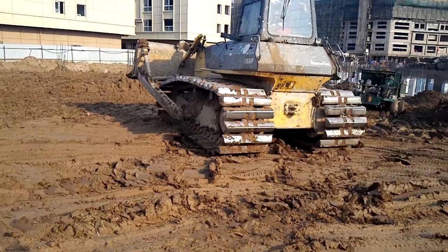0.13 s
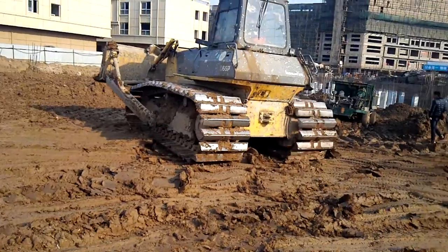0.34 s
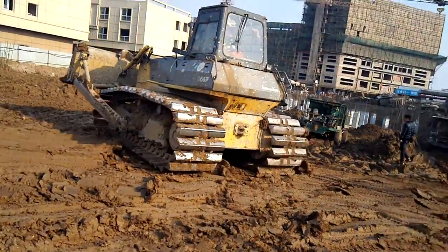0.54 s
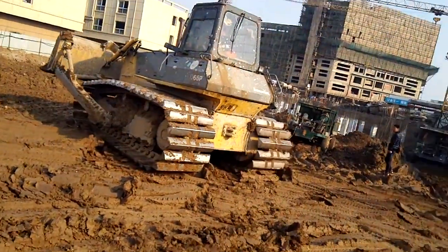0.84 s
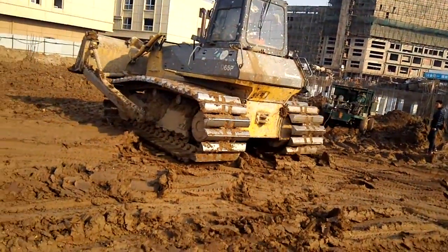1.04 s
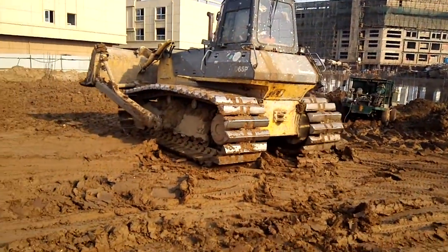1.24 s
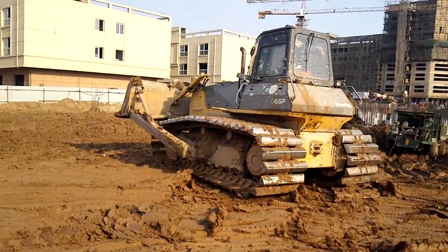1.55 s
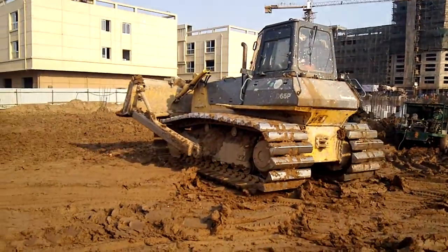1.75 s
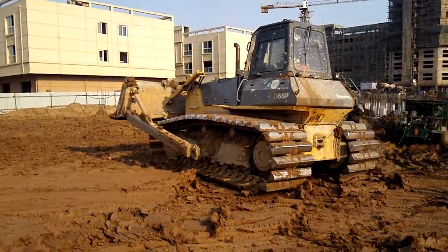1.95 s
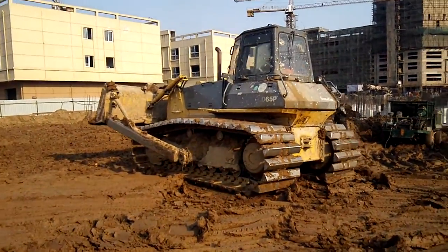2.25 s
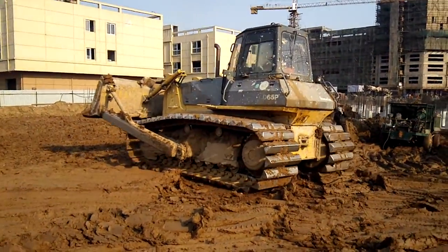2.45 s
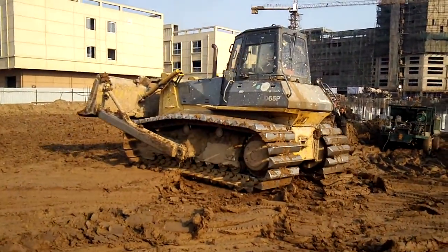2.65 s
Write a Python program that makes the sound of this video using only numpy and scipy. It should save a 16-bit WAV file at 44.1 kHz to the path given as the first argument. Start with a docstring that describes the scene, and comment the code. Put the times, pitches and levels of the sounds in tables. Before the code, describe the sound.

Close bulldozer diesel roar with harsh bursts of squealing, clattering metal tracks on an open building site.

```python
"""A crawler bulldozer drives over a muddy building site, a few metres away, as the sound fades in.
Its six-cylinder diesel drones at governed speed: harmonic puffs, filtered noise, fan tones, a turbo whistle.
From the first moments its dry steel tracks slip in grinding bursts of little impacts that ring the shoes;
squeaks and singing pins are trembling tones, and clanks are decaying modes heard in the middle stretch.
Then the chassis bumps once, a swell of resonant noise, and the fan drone grows towards the end."""
import sys
import numpy as np
from scipy import signal
from scipy.fft import rfft, irfft
from scipy.io import wavfile

SR = 44100
rng = np.random.default_rng(int(sys.argv[2]) if len(sys.argv) > 2 else 0)


def int16_out(signal):
    """Quantize to a 16-bit WAV file."""
    q = np.round(np.clip(np.atleast_2d(signal).T, -1, 1) * 32767)
    wavfile.write(sys.argv[1], SR, q.astype(np.int16))


N = 123039
TIME = np.arange(N) / SR
FREQS = np.maximum(np.fft.rfftfreq(N, 1 / SR), 1)

# engine
CYCLE_HZ, FIRST_FIRING_S = 13.42, .0013   # four-stroke cycles per second
SPEED_WANDER = .0004   # share of the crank speed
TONE_WAVER_DB, PUFF_SPREAD_DB = .7, 1   # of each order; of all tones together
FAN_HZ, FAN_WAVER_DB = 142.9, .8   # blade rate
CLATTER_DB, RUMBLE_DB = -20.5, -26.8
KNOCK_DB, KNOCK_S, KNOCK_SPREAD_DB = -39, 0.0051, 3
TICKS_PER_S, TICK_DB, TICK_S = 160, -30, 0.00095   # hard contacts, at unit knock strength
CYCLE_REPEAT = .25   # share of the clatter's power that is the same in every cycle
TURBO_DB, TURBO_WIDTH_HZ, TURBO_PAN_DB = -35.5, 52, 4
THUD_S, THUD_LENGTH_S, THUD_HZ, THUD_DB = 1.8, 0.055, 215, -20.5

# tracks
SLIP_GRAINS_PER_S, GRAIN_SPREAD_DB = 5000, 1   # rate in each noise stream
SLIP_LIKENESS = 0.31   # share of power common to both sides
SLIP_ATTACK_S, SLIP_RELEASE_S = 0.00085, 0.0066
SNAP_DB, SNAP_S = -16, 0.00094   # the link breaks loose with a snap
CHATTER_DB, CHATTER_PER_S = 0.5, 54   # a sliding link catches and lets go
SHOE_SPREAD_DB, SHOE_DETUNE = 2.5, 0.02   # from link to link; detune as a share
SHOE_RING_DB, SHOE_RING_WIDTH_HZ = -7, 70   # sharp modes beside the broad ones
SQUEAK_WIDTH_HZ = 110   # at the pitch of the lower pin mode
SQUEAK_SAG_PER_S, SQUEAK_OVERTONE_DB = .15, -12   # share of pitch lost; level of the octave
PIN_WIDTH_HZ, PIN_PAN_DB = 34.7, 8
ATTACK_SHARE = 0.69   # a swell rises faster than it dies
RATTLES_PER_S, RATTLE_DB = 86, -40   # loose track hardware; rate in each noise stream
CLANK_CRACK_DB, CLANK_CRACK_S = 4, 0.0011   # level relative to the ringing modes

# surroundings and pickup
ECHO_DB, ECHO_T60_S = -8.5, 0.14
CUTOFF_HZ = 14000

# low resonances of the track shoes, heard as grind: pitch_hz, width_hz (nominal), relative level_db
GRIND_MODES = [(1630, 670, 2.5), (2410, 470, 1.5), (3025, 370, 3), (3690, 500, 6), (4277, 620, 1.5)]
# the two modes in which a track pin sings: pitch_hz
PIN_HZ = [9044, 12285]


def from_db(db):
    """Logarithmic level: decibels to amplitude gain."""
    return 10 ** (np.asarray(db) / 20)


def rms_one(x):
    """Power normalisation: scale to unit rms."""
    return x / np.sqrt(np.mean(x ** 2) + 1e-20)


def in_time(rows):
    """Linear interpolation: the columns of a curve at every sample."""
    s, *columns = np.transpose(rows)
    return [np.interp(TIME, s, column) for column in columns]


def at_hz(points):
    """Interpolation over log frequency: a spectrum table at every frequency."""
    hz, value = np.transpose(points)
    return np.interp(np.log(FREQS), np.log(hz), value)


def pan(left_right_db):
    """Constant-power panning: left and right gains with the given level difference."""
    gains = from_db(np.array([[.5], [-.5]]) * left_right_db)
    return gains / np.sqrt(np.mean(gains ** 2, axis=0))


def drift(rate_hz):
    """Low-pass noise: a slow random fluctuation with unit rms."""
    size = 4096
    hz = np.arange(size // 2 + 1) * SR / N
    slow = irfft(rfft(rng.standard_normal(size)) / (1 + (hz / rate_hz) ** 2))
    return np.interp(TIME, np.linspace(0, N / SR, size), rms_one(slow))


def resonate(x, hz, width_hz):
    """A damped oscillator: one two-pole resonance with about unit gain at its peak."""
    radius = np.exp(-np.pi * width_hz / SR)
    zeros = np.array([1, 0, -1]) * (1 - radius * radius) / 2
    poles = [1, -2 * radius * np.cos(2 * np.pi * hz / SR), radius * radius]
    return signal.lfilter(zeros, poles, x + 1e-18)


def swell(middle_s, length_s):
    """A skewed Gaussian envelope: a quick rise and a slower fall around a moment."""
    t = (TIME - middle_s) / length_s
    skewed = np.where(t < 0, t / ATTACK_SHARE, t)
    return np.exp(-np.minimum(2 * skewed ** 2, 20))


def held(start_s, length_s):
    """A stick-slip envelope: an abrupt attack, a hold and a short exponential release."""
    t = TIME - start_s
    attack = np.clip(t / SLIP_ATTACK_S, 0, 1)
    return attack * np.exp(-np.clip((t - length_s) / SLIP_RELEASE_S, 0, 20))


def unsteady_tone(hz, width_hz, overtone=0):
    """Random frequency modulation: a friction or flow tone trembles, slightly differently at each side."""
    angle = 2 * np.pi * np.cumsum(hz + width_hz * drift(103.8)) / SR
    sides = []
    for _ in range(2):
        phase = angle + .5 * drift(17)
        wave = np.sin(phase) + overtone * np.sin(2 * phase)
        sides.append(np.sqrt(2) * wave * from_db(2 * drift(76)))
    return np.array(sides)


def grains(rate, size):
    """Shot noise: two partly alike sides of random little impacts of uneven strength."""
    strengths = from_db(GRAIN_SPREAD_DB * rng.standard_normal((3, size)))
    signs = rng.choice([-1, 1], (3, size))
    hits = strengths * signs * (rng.random((3, size)) < rate / SR)
    return np.sqrt(SLIP_LIKENESS) * hits[0] + np.sqrt(1 - SLIP_LIKENESS) * hits[1:]


def scatter(x):
    """Diffuse reflection: a short exponentially decaying tail from the hull and the ground."""
    t = TIME[:SR // 2]
    tail = rng.standard_normal((2, len(t))) * from_db(-60 * t / ECHO_T60_S)
    return signal.fftconvolve(x, tail / np.sqrt(np.sum(tail[0] ** 2)), axes=1)[:, :N]


def thud():
    """Resonance of a heavy body: the chassis booms once with a dull bump."""
    boom = rng.standard_normal(N)
    for _ in range(2):
        boom = resonate(boom, THUD_HZ, 70)
    return from_db(THUD_DB) * swell(THUD_S, THUD_LENGTH_S) * rms_one(boom)


def turbo():
    """A rotor tone: the thin whistle creeps up as the turbine gathers speed, then nearly levels off."""
    # whistle pitch: time_s, pitch_hz
    whistle = [(0, 10480), (.3, 10560), (.7, 10680), (1.2, 10735), (1.9, 10750), (2.79, 10735)]
    hz, = in_time(whistle)
    return from_db(TURBO_DB) * pan(TURBO_PAN_DB) * unsteady_tone(hz, TURBO_WIDTH_HZ)


def radiate(pair, spectrum):
    """Structural radiation: colour two signals, ring the engine's panels and spread the sound; rms 1."""
    # resonances of block and bonnet: pitch_hz, width_hz, lift_db
    panels = [(371, 42, 4), (524, 22, 11), (657, 64, 3.5), (760, 30, 6.5), (1248, 240, 2.5), (1534, 67, 6),
              (1663, 33, 5), (2260, 150, 2), (2940, 87, 1)]
    # left-right likeness, negative values acting as zero: frequency_hz, likeness
    likeness = [(60, 1), (130, 0.91), (280, 0.82), (620, 1), (1340, 0.74), (2910, 0.22), (6320, -0.19),
                (13700, -0.17)]
    # lean to the engine's side: frequency_hz, left_right_db
    lean = [(200, 1), (700, 3.5), (2300, 8), (3500, 6.5), (5300, 2), (6500, 5.5), (8000, 0), (11000, 6.5)]
    panels_db = sum(db / (1 + (2 * (FREQS - hz) / width) ** 2) for hz, width, db in panels)
    mid, side = rfft(pair) * from_db(at_hz(spectrum) + panels_db)
    alike = np.clip(at_hz(likeness), 0, 1)
    both = mid + np.sqrt((1 - alike) / (1 + alike)) * side * [[1], [-1]]
    return rms_one(irfft(both * pan(at_hz(lean)), N))


def exhaust(cycles, upper_db, high_db):
    """Harmonic synthesis: phase-locked multiples of the firing rate give puffs; other orders are loose."""
    # exhaust tones: order (multiple of the cycle rate), level_db
    orders = [(3, -51), (4, -44), (5, -41.5), (6, -25.5), (7, -37.5), (10, -35.5), (12, -24), (14, -41.5),
              (15, -36), (16, -47), (20, -33.5), (21, -41), (24, -41), (32, -49), (39, -49), (48, -38),
              (66, -38), (87, -41), (124, -39), (170, -41.5)]
    out = 0
    for order, db in orders:
        load_db = high_db if order > 15 else upper_db if order > 10 else 0
        offset = rng.random() * (order % 6 > 0)
        gain = from_db(db + load_db + TONE_WAVER_DB * drift(9))
        out = out - gain * np.sin(2 * np.pi * (order * cycles + offset))
    return out


def fan(clock, fan_db, high_db):
    """Blade-passing tones: the fan's drone and harmonics, locked to the crank speed."""
    # blade rate and its harmonics in turn: level_db
    harmonics = [-27.5, -33.5, -60, -37]
    out = 0
    for k, db in enumerate(harmonics):
        load_db = high_db if k else fan_db
        gain = from_db(db + load_db + FAN_WAVER_DB * drift(12.0))
        out = out - gain * np.cos(2 * np.pi * (k + 1) * FAN_HZ * clock)
    return out


def valve_gear(cycles):
    """Cyclic noise: valves, injectors and gears repeat each cycle, mixed with fresh noise."""
    size = int(SR / CYCLE_HZ)
    repeated = rng.standard_normal((2, SR // 10))[:, (cycles % 1 * size).astype(int)]
    return np.sqrt(CYCLE_REPEAT) * repeated + np.sqrt(1 - CYCLE_REPEAT) * rng.standard_normal((2, N))


def combustion_clatter(cycles, clatter_db):
    """Amplitude-modulated noise: a knock at each firing and the valve ticks gate the clatter."""
    # combustion clatter: frequency_hz, relative density_db (per Hz); the narrow peak near 10.7 kHz is turbo
    # whistle noise carried along with it
    spectrum = [(180, -29), (300, -9), (460, -9.5), (750, -8), (1000, -9), (1600, -10), (2400, -9.5),
                (3800, -13.5), (4800, -22.5), (6000, -21), (8000, -17), (9100, -16.5), (10200, -23),
                (10700, -11), (11300, -33), (13500, -60)]
    firings = 6 * cycles
    since_s = firings % 1 / (6 * CYCLE_HZ)
    strength = from_db(KNOCK_SPREAD_DB * rng.standard_normal(size=400))[firings.astype(int)]
    knock = rms_one(strength * np.exp(-since_s / KNOCK_S))
    contacts = (rng.random(N) < TICKS_PER_S * knock / SR) * rng.random(N)
    ticks = rms_one(signal.lfilter([1], [1, -np.exp(-1 / (TICK_S * SR))], contacts + 1e-18))
    blows = np.hypot(from_db(KNOCK_DB) * knock, from_db(TICK_DB) * ticks)
    gate = np.hypot(from_db(CLATTER_DB), blows) * from_db(clatter_db + 1.0 * drift(17))
    return np.sqrt(np.mean(gate ** 2)) * radiate(gate * valve_gear(cycles), spectrum)


def engine():
    """Periodic excitation: exhaust, fan, knock and ticks on one crank speed, over steady rumble noise."""
    # gains over time: time_s, clatter_db, fan_db (blade rate),
    # upper_db (tones near twice the firing rate), high_db (higher tones and fan harmonics)
    effort = [(0, 1.5, -6, 1, 0), (.35, -1, -9, -1, -11), (.6, -1.5, -3.5, 2, -4.5),
              (1.0, -0.5, -7, 0, -3.5), (1.3, 0.5, -3, -0.5, -2), (1.55, -1, 0.5, 0, 0),
              (1.85, 3, -2, 1.5, 1.5), (2.1, 2.5, 5, -4, 2), (2.45, 1.5, 3.5, 0.5, 0.5),
              (2.79, 3, 7.5, -9, -3.5)]
    # exhaust rumble: frequency_hz, relative density_db (per Hz)
    rumble_spectrum = [(20, -18), (40, -4.5), (62, -9), (100, -3), (145, 1), (200, -2), (300, -9.5),
                       (450, -14), (900, -66)]
    clatter_db, fan_db, upper_db, high_db = in_time(effort)
    clock = np.cumsum(1 + SPEED_WANDER * drift(1.6)) / SR
    cycles = CYCLE_HZ * (clock - FIRST_FIRING_S)
    puffs = exhaust(cycles, upper_db, high_db) * from_db(PUFF_SPREAD_DB * drift(40))
    tones = puffs + fan(clock, fan_db, high_db)
    rumble = from_db(RUMBLE_DB) * radiate(rng.standard_normal((2, N)), rumble_spectrum)
    return np.sqrt(2) * tones + combustion_clatter(cycles, clatter_db) + rumble


def shoe(hits, modes):
    """Modal resonance: a track shoe rings in broad and sharp modes, each shoe a little differently; rms 1."""
    broad = sharp = 0
    for hz, width, db in modes:
        hz = hz * (1 + SHOE_DETUNE * rng.standard_normal())
        # two doubled-width resonances in series make one broad mode with steep skirts
        band = resonate(resonate(hits, hz, 2 * width), hz, 2 * width)
        band = from_db(db + SHOE_SPREAD_DB * rng.standard_normal()) * band
        broad = broad + band
        sharp = sharp + resonate(band, hz + width * rng.uniform(-0.46, 0.52), SHOE_RING_WIDTH_HZ)
    return rms_one(rms_one(broad) + from_db(SHOE_RING_DB) * rms_one(sharp))


def loose_rattle():
    """Random impact excitation: loose track hardware rings the low shoe modes steadily."""
    return from_db(RATTLE_DB) * shoe(grains(RATTLES_PER_S, size=N), GRIND_MODES)


def singing_pins():
    """Narrow-band resonance: the track pins sing in two modes that swell and fade."""
    # pin_swells: middle_s, length_s (nominal), lower_mode_db, upper_mode_db
    pin_swells = [(0.217, 0.016, -20, -29), (.512, 0.027, -43, -30), (0.537, 0.037, -23, -39),
                  (0.615, 0.036, -28, -27), (0.723, .015, -42, -29), (0.778, 0.023, -25, -44),
                  (0.816, 0.029, -22.5, -46), (0.898, 0.033, -24, -36), (1.09, .03, -37, -57),
                  (1.401, .025, -44, -29), (1.643, 0.028, -16, -18.5), (1.914, 0.16, -25.5, -34),
                  (2.04, .025, -36, -27), (2.185, 0.037, -25, -30), (2.241, .02, -24, -48),
                  (2.293, 0.019, -23, -34), (2.524, 0.058, -26.5, -28), (2.758, 0.061, -24, -31)]
    out = 0
    for k, hz in enumerate(PIN_HZ):
        level = sum(from_db(dbs[k]) * swell(s, length) for s, length, *dbs in pin_swells)
        out = out + level * pan(PIN_PAN_DB) * unsteady_tone(hz, PIN_WIDTH_HZ)
    return out


def squeaks():
    """Friction-driven oscillation: a slip locks into one sagging pitch, with its octave below the cutoff."""
    # locked slips: start_s, length_s (before release), pitch_hz (mid-length), level_db, left_right_db
    locked = [(.405, .012, 8540, -27, -5), (0.636, 0.02, 8900, -22, 10), (0.657, 0.0088, 4180, -19.5, 13),
              (0.714, .01, 2860, -21, 14), (.765, .006, 7800, -25, 4), (0.806, .005, 3930, -18.5, 20),
              (0.944, 0.0095, 3620, -21, 11), (1.169, 0.018, 2923, -20.5, 3), (1.199, 0.01, 6460, -23, -1),
              (1.208, .02, 5930, -29.5, -11), (1.227, 0.0054, 1697, -20, 5), (1.725, 0.021, 3850, -34, 1),
              (1.758, .03, 9770, -19, 3), (1.765, 0.014, 6050, -26, -12), (1.866, 0.0111, 820, -18, -4),
              (2.749, 0.042, 9480, -22.5, -20)]
    out = np.zeros((2, N))
    for s, length, hz, db, pan_db in locked:
        pitch = hz * (1 - SQUEAK_SAG_PER_S * np.clip(TIME - s - length / 2, -length, length))
        overtone = from_db(SQUEAK_OVERTONE_DB) * (2 * hz < CUTOFF_HZ)
        tone = unsteady_tone(pitch, SQUEAK_WIDTH_HZ * hz / PIN_HZ[0], overtone=overtone)
        out += from_db(db) * pan(pan_db) * held(s, length) * tone
    return out


def link_slips():
    """Stick-slip friction: bursts of dense impacts ring three bands of shoe modes after a snap."""
    # slipping links: start_s, length_s (before release), grind_db, rasp_db, screech_db, left_right_db
    slipping = [(0.206, 0.011, -46, -39, -26, -5), (0.287, 0.042, -33, -27.5, -28, 6),
                (0.342, 0.032, -22.5, -24.5, -24, 1.5), (0.402, 0.011, -36, -29, -25.5, 3),
                (0.507, 0.012, -43, -36, -26, 3), (0.532, 0.037, -43, -39.0, -27, 7),
                (0.581, 0.013, -28, -26, -18.0, 5), (0.622, 0.031, -29.5, -28, -18.5, 4),
                (0.639, 0.03, -19, -21, -17.5, 2.5), (0.712, 0.0068, -21.5, -24, -21.5, 3),
                (0.766, 0.0066, -23, -22, -22, 4), (0.808, 0.0098, -18, -31, -18, 4),
                (0.851, 0.038, -25.5, -27, -23.5, 2), (0.888, 0.025, -22, -25.0, -21.5, 4),
                (0.92, 0.019, -24.5, -22, -15, 7), (0.932, 0.031, -22, -27, -19, 4),
                (1.038, 0.014, -33, -32.5, -20, 2), (1.067, 0.012, -30.5, -26, -23, 0),
                (1.104, 0.039, -24.5, -25.5, -23.5, 4), (1.172, 0.023, -26.5, -23.5, -23.5, 1),
                (1.2, 0.016, -19.5, -20, -21.0, 3), (1.217, 0.013, -18.5, -23.5, -21, 3),
                (1.467, 0.018, -25.5, -25.5, -21, 1), (1.485, 0.034, -22, -25, -22, 4),
                (1.604, 0.026, -23, -28, -21.0, 2), (1.639, 0.018, -23, -30, -18.5, 1),
                (1.721, 0.024, -19.5, -29, -17.5, 3), (1.759, 0.039, -22, -25, -20, 2.5),
                (1.869, 0.046, -26, -30, -22, 1), (1.897, 0.038, -25, -23, -19, 1.5),
                (2.005, 0.028, -37, -29, -23.5, 1), (2.039, 0.02, -23, -24, -17.5, 2),
                (2.164, 0.031, -28, -27, -27, 3), (2.295, 0.055, -26, -29, -21.5, 4),
                (2.579, 0.059, -26, -29, -26.5, 4), (2.717, 0.042, -20.5, -29, -25.5, 3.5)]
    # middle and high shoe resonances: pitch_hz, width_hz (nominal), relative level_db
    rasp_modes = [(5110, 620, 1), (5900, 410, 5), (6920, 930, -2)]
    screech_modes = [(7600, 1080, 10), (8210, 520, 11), (8940, 360, 12), (9270, 1030, 3.5),
                     (10030, 840, -2), (13550, 450, -5.5)]
    out, reach = np.zeros((2, N)), SR // 8
    chatter = from_db(CHATTER_DB * drift(CHATTER_PER_S))
    for s, length, *dbs, pan_db in slipping:
        hits = grains(SLIP_GRAINS_PER_S, size=reach)
        burst = 0
        for db, modes in zip(dbs, (GRIND_MODES, rasp_modes, screech_modes)):
            burst = burst + from_db(db) * shoe(hits, modes)
        start = int(s * SR)
        shape = (held(s, length) * chatter)[start:start + reach]
        snap = 1 + from_db(SNAP_DB) * np.exp(-TIME[:len(shape)] / SNAP_S)
        out[:, start:start + reach] += pan(pan_db) * shape * snap * burst[:, :len(shape)]
    return out


def clanks():
    """Modal impact: a shoe drops onto its roller; a noise crack, then modes of chance strength die away."""
    # drops: start_s, peak_db (before panning), left_right_db
    drops = [(.659, -12, 5), (.767, -21, 6), (.809, -9, 3), (.951, -5, 11), (1.173, -11, 0),
             (1.209, -12, 3), (1.229, -12, 3), (1.47, -7, 2), (1.605, -12, 2), (1.724, -9, 4),
             (1.765, -14, 1)]
    # modes of the struck steel: pitch_hz, damping_hz (twice the resonance width), relative level_db
    struck_modes = [(1700, 120, 1), (2880, 110, -3), (3780, 90, 0), (4210, 100, -7), (5220, 96, -1),
                    (6020, 90, -3), (6400, 140, -3), (8100, 140, 2)]
    out, t = np.zeros((2, N)), TIME[:SR // 16]
    for s, db, pan_db in drops:
        hit = from_db(CLANK_CRACK_DB) * rng.standard_normal((2, len(t))) * np.exp(-t / CLANK_CRACK_S)
        for hz, damping, mode_db in struck_modes:
            turns = hz * (1 + SHOE_DETUNE * rng.standard_normal()) * t + .5 * rng.random((2, 1))
            gain = from_db(mode_db + SHOE_SPREAD_DB * rng.standard_normal())
            hit += gain * np.sin(2 * np.pi * turns) * np.exp(-np.pi * damping * t / 2)
        start = int(s * SR)
        out[:, start:start + len(t)] += from_db(db) * pan(pan_db) * hit / np.abs(hit).max()
    return out


def scene():
    """Superposition: engine, turbo, chassis and tracks together, with an echo of the track steel."""
    steel = loose_rattle() + singing_pins() + squeaks() + link_slips() + clanks()
    return from_db(ECHO_DB) * scatter(steel) + thud() + turbo() + engine() + steel


def ports(x):
    """Interaural-style differences: the microphone's two ports shift phase and level against each other."""
    # port differences: frequency_hz, left_lead_rad, left_right_db
    differences = [(206, 0, -0.5), (364, -0.5, -1), (497, -1.84, -0.5), (800, -1.34, 1.5), (1560, 0.25, -4),
                   (2230, -0.6, 1), (2630, 1, -1.5), (2750, 0.9, -0.5), (3430, -1.6, -2), (3980, 6, -4),
                   (5000, 5, -5.5), (5940, 4, -11.5), (7400, 4.5, 1), (8000, 5.5, 0), (10600, 7, -2),
                   (10740, 11.5, 0.5), (11500, 10, -2)]
    hz, radians, db = np.transpose(differences)
    turn = np.exp(.5j * at_hz(np.c_[hz, radians]) * np.array([[1], [-1]]))
    return irfft(rfft(x) * turn * pan(at_hz(np.c_[hz, db])), N)


def record(dry):
    """Gain, clipping and band limiting: the sound fades in, peaks are clipped and the top is cut."""
    # overall gain: time_s, gain_db
    fade = [(0, -100), (.112, -71), (.116, -20), (.16, -15.5), (.2, -8), (.27, -4), (.33, 1), (2.79, -1)]
    fade_db, = in_time(fade)
    heard = np.clip(ports(dry) * from_db(fade_db), -.85, .85)
    # the stopband, 70 dB down, starts 700 Hz above the cutoff
    low_pass = signal.cheby2(14, 70, CUTOFF_HZ + 700, fs=SR, output="sos")
    return signal.sosfilt(low_pass, heard)


dry = scene()
out = record(dry)
int16_out(out)
```